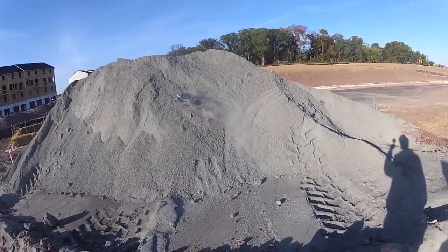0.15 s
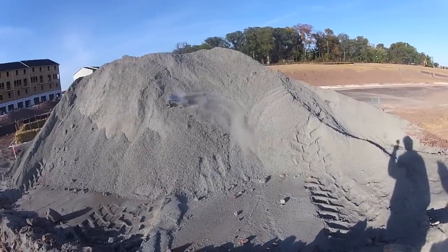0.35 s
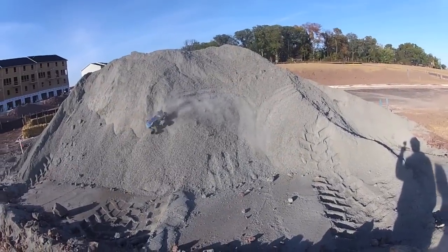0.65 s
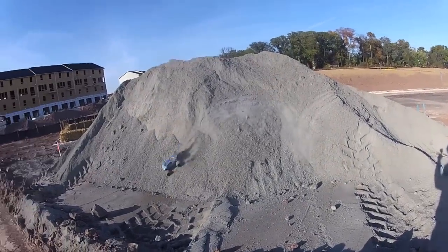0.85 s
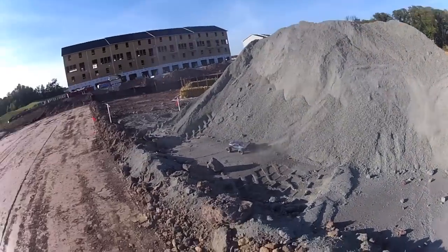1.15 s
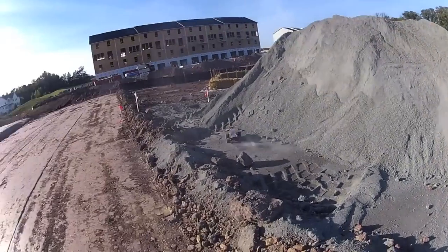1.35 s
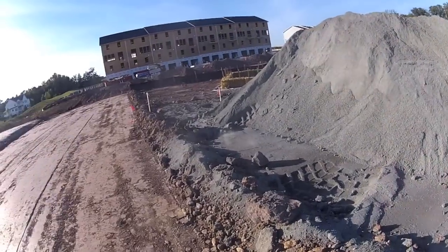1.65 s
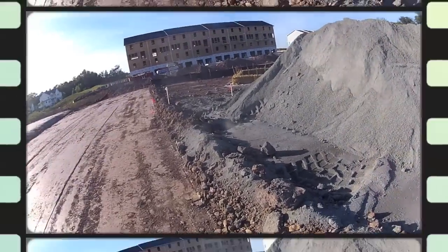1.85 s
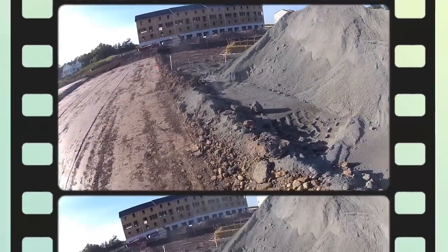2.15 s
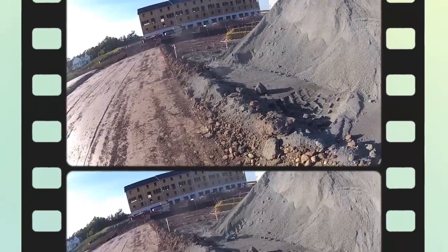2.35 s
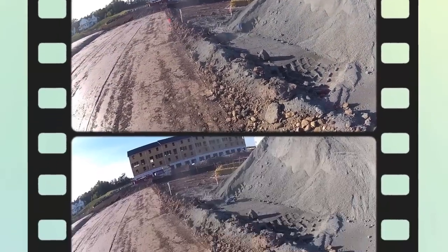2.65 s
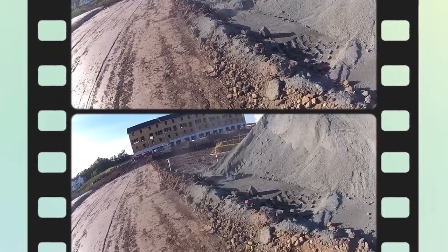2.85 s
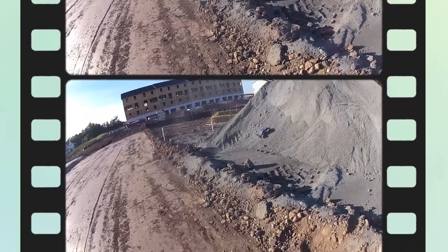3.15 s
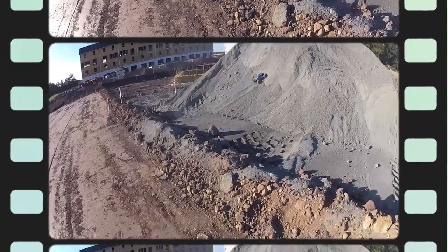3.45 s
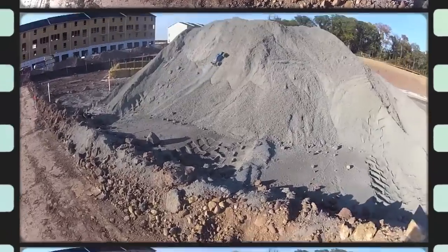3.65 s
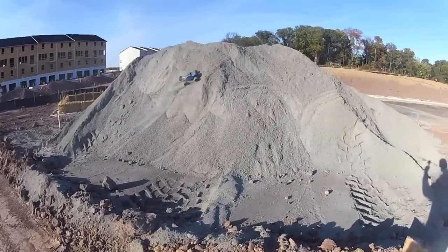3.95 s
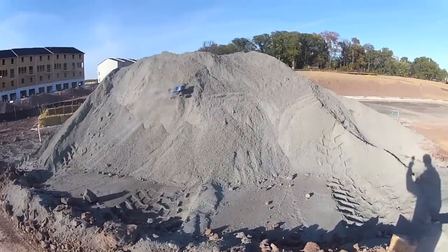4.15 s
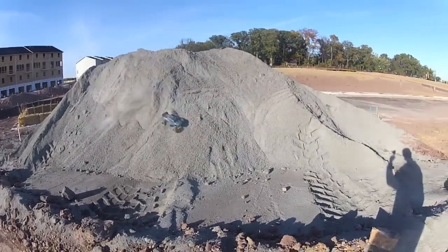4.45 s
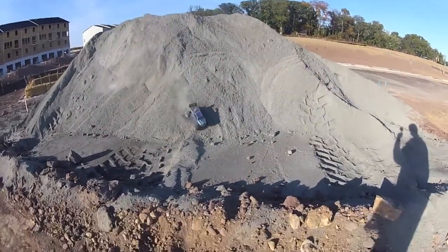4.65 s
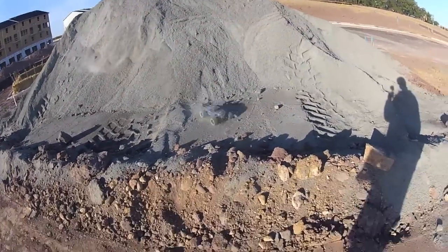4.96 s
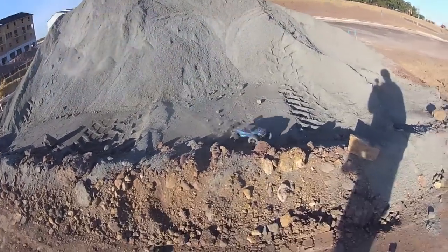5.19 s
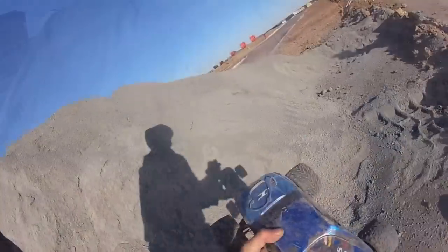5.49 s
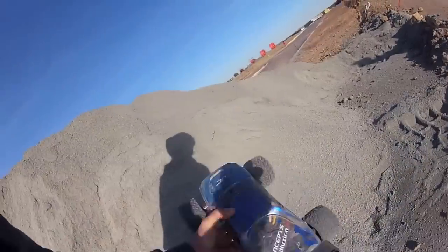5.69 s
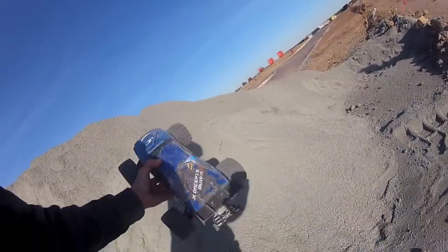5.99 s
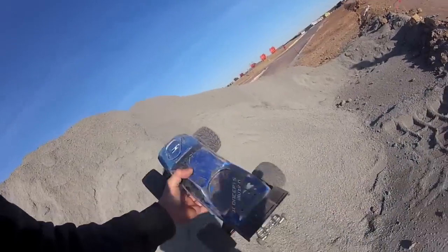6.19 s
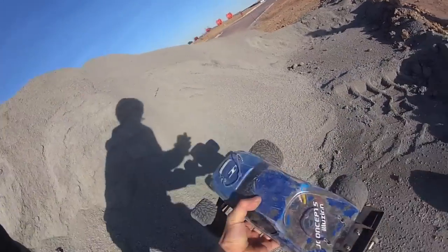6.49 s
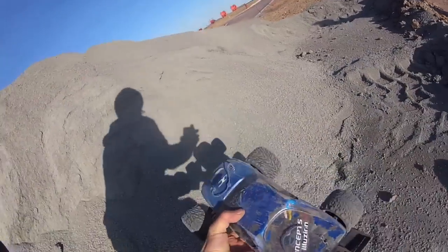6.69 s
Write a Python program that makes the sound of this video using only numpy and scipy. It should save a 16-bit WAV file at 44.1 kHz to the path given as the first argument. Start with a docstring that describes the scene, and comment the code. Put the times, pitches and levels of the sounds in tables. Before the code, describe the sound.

Outdoors on a gravel heap, a small electric model truck's gears whine roughly in throttle bursts while tyres spray grit. A hard plastic knock comes just after two seconds, the running sound sinks almost to silence, then returns brighter. Two more hard knocks and stone ticks follow, and finally the drive train whirrs close up. Low wind rumbles softly; a body-worn microphone in a plastic case gives everything a boxy, glassy colour.

```python
"""The gears of a small electric model truck whine roughly, as tones partly smeared into noise bands, over loose gravel.
Tyres spray and crunch grit (random impacts over hiss), stones tick (noise bursts) and wind rumbles (shaped noise).
All is heard through a body-worn camera in a plastic case; three hard knocks and some faint ones ring its modes.
The running sound fades almost to nothing and returns; at the end the truck is held close and its drive train whirrs."""
import sys
import numpy as np
from scipy import signal
from scipy.fft import rfft, irfft, next_fast_len
from scipy.io import wavfile

SR = 44100
rng = np.random.default_rng(int(sys.argv[2]) if len(sys.argv) > 2 else 0)


def transcribe(signal):
    """Save signal, clipped to [-1, 1], as a 16-bit WAV file at the path in sys.argv[1]."""
    frames = np.atleast_2d(signal).T
    limited = np.clip(frames, -1, 1)
    pcm = np.round(limited * 32767).astype(np.int16)
    wavfile.write(sys.argv[1], SR, pcm)


N = 301203
TIME = np.arange(N) / SR

# Motor speed: t/s, gear whine f/Hz
MOTOR_SPEED = [(0.0, 2200), (0.63, 2288), (1.22, 2215), (1.31, 2008), (1.38, 2200), (2.06, 2037),
               (3.01, 2260), (3.11, 2070), (3.55, 2000), (3.68, 2276), (4.0, 2129), (4.29, 2330),
               (4.92, 2045), (5.04, 2307), (5.23, 2298), (5.4, 2033)]
# Bursts of throttle, relative levels at mid-burst: start t/s, end t/s, whine level/dB, rasp level/dB,
# grit spray level/dB, swell/(dB per s), load (0 to 1)
THROTTLE_BURSTS = [(-.1, .84, -60.5, -69, -65.5, -8, 0.51), (0.953, 1.198, -61.5, -69.5, -67.5, 8.5, .15),
                   (1.225, 1.52, -65, -67, -66, -20, .05), (1.878, 2.32, -67, -65.5, -70.5, 9, .2),
                   (2.86, 3.18, -67.5, -63.5, -64.5, 0, .1), (3.207, 3.58, -59.5, -57.5, -68, -0.5, 0),
                   (3.614, 4.1, -60.5, -60.5, -64.5, -1, .2), (4.134, 4.557, -60.5, -61, -63, 7.5, 0.6),
                   (4.762, 4.85, -65, -60.5, -63, -13, 0.04), (4.98, 5.32, -63.5, -62, -62.5, -15, .1),
                   (6.42, 6.83, -67, -59.5, -72, 5, 0.2)]
# Spectrum of the gear rasp: f/Hz, relative level/dB
RASP_SPECTRUM = [(2100, -26), (2500, -6), (2720, -3.5), (3000, 1), (3250, -9.5), (3700, -40)]
# Drive train close by, relative levels: t/s, tyre hiss level/dB, hollow body level/dB
NEAR_SPIN = [(5.36, -66.5, -75), (5.59, -58.5, -62), (5.608, -62, -68), (5.652, -52.5, -54),
             (5.668, -60.5, -64.5), (5.726, -55, -60.5), (5.908, -59, -75), (6.81, -56.5, -61),
             (6.82, -54.5, -61)]
# Spectra of the close gears, body shell and tyres: f/Hz, relative level/dB
WHIRR_SPECTRUM = [(1250, -20), (1400, -11), (1550, -13), (1790, 0.5), (2020, 1.5), (2270, 1.5), (2450, -10),
                  (2800, -19.5)]
BODY_SPECTRUM = [(620, -42), (780, -8), (950, 1), (1100, -3.5), (1250, -12)]
TYRE_SPECTRUM = [(2300, -8), (2650, 1), (3150, -5), (3620, 5), (3950, -2), (4450, -4), (5100, 1),
                 (5500, 0.5), (6000, -6.5)]
# Spectra of gravel crunch and grit spray: f/Hz, relative level/dB
CRUNCH_SPECTRUM = [(400, -24), (700, 4), (950, -0.5), (1250, -2.5), (1600, -0.5), (2000, 3), (3000, -21)]
SPRAY_SPECTRUM = [(2500, -34.5), (3250, -3.5), (4000, -11.5), (4650, 0.5), (5000, 0.5), (5400, 4.5),
                  (5700, -2.5), (6000, 4.5)]
# Scuffs of tyres and chassis: t/s, relative level/dB, length/s, centre f/Hz, width/Hz
SCUFF_EVENTS = [(0.705, -60, 0.011, 2100, 900), (1.004, -55, 0.02, 2160, 800),
                (1.112, -58.5, .08, 2270, 400), (3.477, -62, 0.069, 3570, 500),
                (3.866, -54.5, 0.015, 4300, 2000), (4.561, -48, 0.019, 3740, 1500),
                (4.566, -52.5, 0.022, 2150, 1500), (4.771, -46.5, 0.011, 3700, 1400),
                (4.794, -52.5, 0.033, 1980, 2800), (5.018, -67.5, 0.18, 755, 300),
                (5.552, -47, 0.008, 2250, 497), (5.644, -48.5, 0.016, 2000, 1200),
                (5.874, -50.5, 0.0092, 2050, 600), (6.076, -47.5, 0.013, 2120, 800)]
# Clearest stones flicked against each other: t/s, level/dB before the decay envelope, length/s
STONE_TICKS = [(0.674, -56, 0.0091), (1.297, -56, .012), (1.92, -55.5, 0.0056), (2.469, -69.5, 0.0093),
               (3.146, -57.5, 0.0073), (4.582, -46, 0.0068), (4.611, -50, 0.0024), (4.6205, -55.5, 0.0054),
               (4.6895, -48, 0.0022), (4.768, -58, 0.011), (4.86, -47, 0.0048), (5.249, -54.5, 0.0091),
               (5.281, -57, 0.0131)]
# Knocks on the case: t/s, relative click level/dB, relative thump level/dB, contact corner f/Hz
CASE_KNOCKS = [(0.821, -47, -37, 503), (0.928, -48, -43, 2580), (2.207, -54.5, -46, 3000),
               (2.2798, -23.5, -14.5, 12000), (2.2808, -49, -52, 9000), (2.2973, -37, -25.5, 2470),
               (2.31, -40, -39, 2000), (2.323, -44.5, -35, 1510), (3.9271, -39.5, -42, 2500),
               (3.981, -39, -32, 1200), (4.0009, -12, -10, 1280), (4.0101, -28.5, -20.5, 5000),
               (4.0381, -27, -20.5, 900), (4.681, -47, -41, 2000), (4.695, -43, -48, 3500),
               (4.7025, -17.5, -14, 1760), (4.7117, -55, -35, 805)]
# Resonances of the shell: f/Hz, relative level/dB, T60/s
SHELL_MODES = [(617, -2.5, 0.021), (710, -14.5, 0.0057), (870, -16, 0.017), (1059, 1.5, 0.026),
               (1358, -11, 0.038), (1460, -9.5, 0.011), (1730, -1.5, 0.011), (2170, -0.5, 0.014),
               (2630, -12.5, .013), (3040, -21, 0.022), (3480, -9.5, .02), (3830, -9, 0.013),
               (4560, -21.5, 0.014), (4860, -27.5, 0.013), (5400, -18.5, 0.01)]
# Resonances of the case rocking on its mount: f/Hz, relative level/dB, T60/s
MOUNT_MODES = [(112, -7, 0.02), (180.7, 0, 0.028), (248, -4, 0.029)]
# Rubs over the case: t/s, relative level/dB, length/s, centre f/Hz, width/Hz
CASE_SCRAPES = [(2.27, -50, 0.0088, 1850, 2540), (2.2783, -31.5, 0.0049, 3500, 800),
                (2.282, -39, 0.011, 2450, 2630), (2.302, -53, 0.019, 1740, 1900),
                (4.007, -39, 0.0087, 2300, 1500), (6.76, -52.5, .09, 171, 212)]
# Colour of the case for sound from outside: f/Hz, width/Hz, lift/dB
CASE_FILTERS = [(1049, 88, 8.5), (1363, 120, 6), (2400, 150, 1), (2495, 49, -5.5), (2677, 260, 10.5),
                (3160, 200, 0), (3450, 89, 4.5), (4140, 210, 10.5), (4740, 170, -5.5), (4960, 120, 5.5),
                (5700, 110, -9)]
# Gusts of wind: t/s, peak level/dB, half-length to 1/e of the power/s
WIND_GUSTS = [(1.035, -58, .22), (2.3, -61.5, 0.098), (3.85, -59, .24), (4.78, -58, .32), (6.83, -59, 0.12)]
# Spectra of wind buffeting and rumble: f/Hz, relative level/dB
BUFFET_SPECTRUM = [(8, -24), (20, -5), (42, -1.5), (70, -13.5), (150, -49.5)]
RUMBLE_SPECTRUM = [(35, -18), (65, -0.5), (130, -1.5), (240, -3.5), (400, -9), (600, -13), (850, -26),
                   (1500, -40)]
# Faint low noise, opposite in the two channels: f/Hz, relative level/dB
SIDE_SPECTRUM = [(24, -31.5), (40, 1), (275, 0), (1660, -18.5), (2210, -29.5), (4400, -20.5), (5870, -37.5),
                 (8000, -26), (10400, -56), (17600, -120)]

THROTTLE_ATTACK_S, THROTTLE_RELEASE_S = 0.054, 0.1
COAST_WHINE_DB, COAST_RASP_DB, COAST_SPRAY_DB = -72.5, -75, -77.5  # rolling with the throttle shut
UPPER_HZ, UPPER_DB = 3695, -11  # second gear tone, level against the whine
TOP_HZ, TOP_DB = 5174, -13.5  # third gear tone, likewise
UPPER_LOAD_DB = 4.5  # lift of both at full load
CHASSIS_HZ, DRONE_DB, DRONE_LOAD_DB = 1056, -17.5, 14.5  # against the whine; lift at full load
WHEEL_HZ, THROB_AT_S, THROB_DB = 12.7, 6.083, 1.7  # the gears swell once per turn of the wheels
WHIRR_OVER_HISS_DB = 5.5  # close gears against the tabulated hiss level
CRUNCH_DB, CRUNCH_FOLLOWS = -69, 0.37  # at median spray; share of the spray's swing in dB
SMALL_TICKS_PER_S, SMALL_TICK_S = 7.7, 0.008
SMALLEST_TICK_DB, TICK_RANGE_DB = -95, 8
BREEZE_DB = -69  # buffeting between gusts
RUMBLE_DB, RUMBLE_FOLLOWS = -62, 0.13  # at mean wind level; share of the gusts' swing in dB
SIDE_NOISE_DB = -82
FADE_S, FADE_OUT_S, FADE_IN_S = 2.83, 0.66, 0.92  # quietest moment, and the ramps before and after it
HOLD_HZ, CUTOFF_HZ = 12000, 15200


def motor(side_ratio):
    """Forced vibration: gear tones, rasp and chassis drone; load makes them ring, bumps shake them together."""
    start, end, whines_db, rasps_db, _, _, loads = np.transpose(THROTTLE_BURSTS)
    gear_hz, = in_time(MOTOR_SPEED)
    gear_db = throttle(whines_db, COAST_WHINE_DB)
    rasp_db = throttle(rasps_db, COAST_RASP_DB)
    load = np.interp(TIME, (start + end) / 2, loads)

    gear = from_db(gear_db) * whine(gear_hz, load, smear_hz=143, line_hz=30, wobble=0.028)
    upper_db = gear_db + UPPER_DB + UPPER_LOAD_DB * load + 2.4 * drift(8.9)
    upper = from_db(upper_db) * whine(UPPER_HZ, load, smear_hz=170, line_hz=60, wobble=0.01)
    top_db = gear_db + TOP_DB + UPPER_LOAD_DB * load + 3.0 * drift(6)
    top = from_db(top_db) * whine(TOP_HZ, load, smear_hz=150, line_hz=50, wobble=0.018)

    side_tone = whine(side_ratio * gear_hz, load, smear_hz=100, line_hz=45, wobble=0.028)
    rough = through_case(coloured(grains(810, 3.8, impact_rms=0.45), RASP_SPECTRUM))
    rasp = from_db(rasp_db - 3.5 + 1.3 * drift(6)) * (rough + 0.59 * side_tone)

    chassis = rms_one(ring(rng.standard_normal(N), CHASSIS_HZ, t60=0.037))
    drone = from_db(gear_db + DRONE_DB + DRONE_LOAD_DB * load) * chassis
    bumps_db = 1.3 * drift(18)
    return (gear + upper + top + rasp + drone) * from_db(bumps_db)


def whine(hz, pure, smear_hz, line_hz, wobble):
    """Modulation of a gear tone: wheel slip shakes its pitch, grit between the teeth smears part into a band."""
    turn = np.exp(2j * np.pi * np.cumsum(hz * (1 + wobble * drift(16.08))) / SR)
    line = rms_one(1 + 0.34 * (drift(line_hz) + 1j * drift(line_hz)))
    smear = rms_one(drift(smear_hz) + 1j * drift(smear_hz))
    pure = np.clip(pure, 0, 1)  # share of the power in the line
    return through_case(np.real(turn * (np.sqrt(pure) * line + np.sqrt(1 - pure) * smear)))


def throttle(levels_db, coast_db):
    """Addition of powers: over coasting, each burst rises quickly, swells or sags, and runs down; in dB."""
    power = from_db(coast_db) ** 2
    for (start, end, *_, swell_db, _), db in zip(THROTTLE_BURSTS, levels_db):
        held_db = db + swell_db * (np.clip(TIME, start, end) - (start + end) / 2)
        attack = np.clip((TIME - start) / THROTTLE_ATTACK_S, 0, 1)
        release = np.exp(-np.clip(TIME - end, 0, 1) / THROTTLE_RELEASE_S)
        power = power + (from_db(held_db) * attack * release) ** 2
    return 10 * np.log10(power)


def whirr():
    """Amplitude modulation close by: gears throb as the wheels turn, the thin body drones, spinning tyres hiss."""
    hiss_db, body_db = in_time(NEAR_SPIN)
    near = np.clip((TIME - 5.3) / 0.12, 0, 1)
    throb_db = THROB_DB * np.cos(2 * np.pi * WHEEL_HZ * (TIME - THROB_AT_S)) + 1.04 * drift(30)
    gears_db = hiss_db + WHIRR_OVER_HISS_DB + throb_db
    gears = from_db(gears_db) * coloured(grains(1500, 5.0, impact_rms=0.62), WHIRR_SPECTRUM)
    body = from_db(body_db - 0.3) * coloured(grains(880, 3.5, impact_rms=0.74), BODY_SPECTRUM)
    hiss = from_db(hiss_db + 1.5) * coloured(grains(2200, 4.7, impact_rms=0.8), TYRE_SPECTRUM)
    return near * (gears + body + hiss)


def gravel():
    """Granular impact noise: under throttle the tyres spray fine grit and crunch harder through the heap."""
    *_, sprays_db, _, _ = np.transpose(THROTTLE_BURSTS)
    spray_db = throttle(sprays_db, COAST_SPRAY_DB)
    crunch_db = CRUNCH_DB + CRUNCH_FOLLOWS * (spray_db - np.median(spray_db)) + 2.1 * drift(7.1)
    crunch_noise = coloured(grains(500, 4.8, impact_rms=0.6), CRUNCH_SPECTRUM)
    crunch = from_db(crunch_db) * through_case(crunch_noise)
    spray_noise = coloured(grains(1200, 4.9, impact_rms=0.76), SPRAY_SPECTRUM)
    spray = from_db(spray_db + 4.5 + 1.8 * drift(33)) * through_case(spray_noise)
    return crunch + spray


def stones():
    """Friction and impact as transient noise bands: single scuffs and thin ticks of flicked stones."""
    out = np.zeros(N)
    for s, db, length, hz, width_hz in SCUFF_EVENTS:
        add(out, s, from_db(db - 0.5) * burst(length, hz, width_hz))
    for s, db, length in STONE_TICKS:
        add(out, s, from_db(db) * burst(length, hz=5600, width_hz=740))
    return out


def small_stones():
    """Random independent impacts: further, fainter stone ticks of the same pitch, scattered at random times."""
    out = np.zeros(N)
    count = int(SMALL_TICKS_PER_S * N / SR)
    for when, size in rng.random((count, 2)):
        level = from_db(SMALLEST_TICK_DB + TICK_RANGE_DB * size)
        add(out, when * (N - 1) / SR, level * burst(SMALL_TICK_S, hz=5600, width_hz=660))
    return out


def knocks(lag_s, push_s):
    """Impulse excitation: a contact rings the shell at once, then the case rocks on its mount with a low thump."""
    clicks, pushes = np.zeros(N), np.zeros(N)
    t = np.arange(SR // 50) / SR
    push = np.exp(-((t - lag_s) / push_s) ** 2)
    for s, click_db, thump_db, bright_hz in CASE_KNOCKS:
        contact = np.exp(-2 * np.pi * bright_hz * t)
        add(clicks, s, from_db(click_db) * contact / contact.sum())
        add(pushes, s, from_db(thump_db) * push / push.sum())
    thump = sum(from_db(db - 5.0) * ring(pushes, hz, t60) for hz, db, t60 in MOUNT_MODES)
    # a stiff mount gives no slow sway
    no_sway = signal.butter(2, 65, "high", fs=SR, output="sos")
    return signal.sosfilt(no_sway, shell(clicks) + thump)


def scrapes(ring_db):
    """Friction excitation: part of each rub on the case is heard directly, part rings the shell."""
    force = np.zeros(N)
    for s, db, length, hz, width_hz in CASE_SCRAPES:
        add(force, s, from_db(db) * burst(length, hz, width_hz))
    return 0.48 * force + from_db(ring_db) * shell(force)


def shell(force):
    """Modal superposition: a contact force drives the modes of the plastic case, with alternating signs."""
    out = np.zeros(N)
    for k, (hz, db, t60) in enumerate(SHELL_MODES):
        out += from_db(db - 3.5) * (-1) ** (k + 1) * ring(force, hz, t60)
    return out


def wind():
    """Turbulent pressure on the case: gusts over a light breeze, and a steadier rumble rising a little with them."""
    power = from_db(BREEZE_DB) ** 2
    for s, db, half_s in WIND_GUSTS:
        power = power + from_db(db) ** 2 * np.exp(-((TIME - s) / half_s) ** 2)
    buffet_db = 10 * np.log10(power)
    rumble_db = RUMBLE_DB + RUMBLE_FOLLOWS * (buffet_db - buffet_db.mean()) + 0.85 * drift(15)
    buffet = from_db(buffet_db + 1.8 * drift(3.8)) * coloured(rng.standard_normal(N), BUFFET_SPECTRUM)
    return buffet + from_db(rumble_db) * coloured(rng.standard_normal(N), RUMBLE_SPECTRUM)


def side_noise():
    """Filtered random noise: a faint steady low noise, for use with opposite signs in the two channels."""
    return from_db(SIDE_NOISE_DB) * coloured(rng.standard_normal(N), SIDE_SPECTRUM)


def through_case(x):
    """Resonant transmission: the hollow case lifts some pitches and swallows others; rms 1."""
    for hz, width_hz, lift_db in CASE_FILTERS:
        g = from_db(lift_db / 2)
        a = np.pi * width_hz / SR
        c = -2 * np.cos(2 * np.pi * hz / SR)
        x = signal.lfilter([1 + a * g, c, 1 - a * g], [1 + a / g, c, 1 - a / g], x)
    return rms_one(x)


def ring(clicks, hz, t60):
    """Damped harmonic oscillator: a unit click starts a decaying sine of initial height 1."""
    r = from_db(-60 / (t60 * SR))
    w = 2 * np.pi * hz / SR
    # the tiny offset keeps the decay out of denormal numbers
    return signal.lfilter([0, np.sin(w)], [1, -2 * r * np.cos(w), r * r], clicks + 1e-18)


def burst(length, hz, width_hz):
    """Transient band noise: a short rub that starts quickly and dies away; rms 1 before its envelope."""
    t = np.arange(SR // 3) / SR
    middle = np.sqrt(hz ** 2 + width_hz ** 2 / 4)  # puts the geometric centre of the band at hz
    edges = [middle - width_hz / 2, middle + width_hz / 2]
    band = signal.butter(2, edges, "band", fs=SR, output="sos")
    noise = rms_one(signal.sosfilt(band, rng.standard_normal(len(t))))
    return noise * (1 - np.exp(-t / (0.078 * length))) * np.exp(-(t / length) ** 3)


def grains(per_s, spread_db, impact_rms):
    """Shot noise: random impacts of uneven size over a smooth hiss of rms 1."""
    sizes = from_db(spread_db * np.minimum(rng.exponential(1, N), 4)) * rng.choice([-1, 1], N)
    impacts = sizes * (rng.random(N) < per_s / SR)
    return impact_rms * rms_one(impacts) + rng.standard_normal(N)


def coloured(x, spectrum):
    """Linear filtering: give a steady sound a spectrum, falling away outside the table; rms 1."""
    hz, db = np.transpose(spectrum)
    size = next_fast_len(N)
    f = np.arange(size // 2 + 1) * SR / size + 1  # 1 Hz offset avoids log(0)
    gain = from_db(np.interp(np.log(f), np.log(hz), db))
    gain = gain * np.minimum(1, f / hz[0]) ** 2 * np.minimum(1, hz[-1] / f) ** 2
    return rms_one(irfft(rfft(x, size) * gain, size)[:N])


def drift(rate_hz):
    """Low-passed random process: two equal poles at a corner rate, drawn every eighth sample; rms 1."""
    r = np.exp(-16 * np.pi * rate_hz / SR)
    noise = rng.standard_normal(N // 8 + 2002)
    slow = signal.lfilter([1], [1, -2 * r, r * r], noise)[2000:]  # drop the settling time
    return np.interp(np.arange(N) / 8, np.arange(len(slow)), rms_one(slow))


def in_time(rows):
    """Linear interpolation: each column of a curve table, sample by sample."""
    s, *columns = np.transpose(rows)
    return [np.interp(TIME, s, c) for c in columns]


def add(track, s, sound):
    """Superposition: mix a short sound in at a time in seconds."""
    at = int(s * SR)
    track[at:at + len(sound)] += sound[:N - at]


def from_db(db):
    """Logarithmic level: decibels to amplitude gain."""
    return 10 ** (np.asarray(db) / 20)


def rms_one(x):
    """Power normalisation: scale to unit mean power."""
    return x / np.sqrt(np.mean(np.abs(x) ** 2) + 1e-20)


def scene():
    """Superposition of sources: the running sound dips and returns; only a faint low noise differs between sides."""
    ramps = np.maximum((FADE_S - TIME) / FADE_OUT_S, (TIME - FADE_S) / FADE_IN_S)
    fade = np.clip(ramps, 0.01, 1)
    running = motor(side_ratio=1.18) + gravel() + small_stones() + wind()
    contacts = stones() + knocks(lag_s=0.0034, push_s=0.00078) + scrapes(ring_db=-21.5)
    mid = fade * running + whirr() + contacts
    side = fade * side_noise()
    return np.array([mid + side, mid - side])


def record(dry):
    """Sample-and-hold imaging: a low hold rate mirrors the sound into a glassy treble; the top is cut."""
    coarse = signal.resample_poly(dry, HOLD_HZ, SR, axis=1)
    held = np.repeat(coarse, 4, axis=1)
    out = signal.resample_poly(held, SR, 4 * HOLD_HZ, axis=1)[:, :N]
    return signal.sosfilt(signal.ellip(10, 0.2, 80, CUTOFF_HZ, fs=SR, output="sos"), out)


dry = scene()
out = record(dry)
transcribe(out)
```